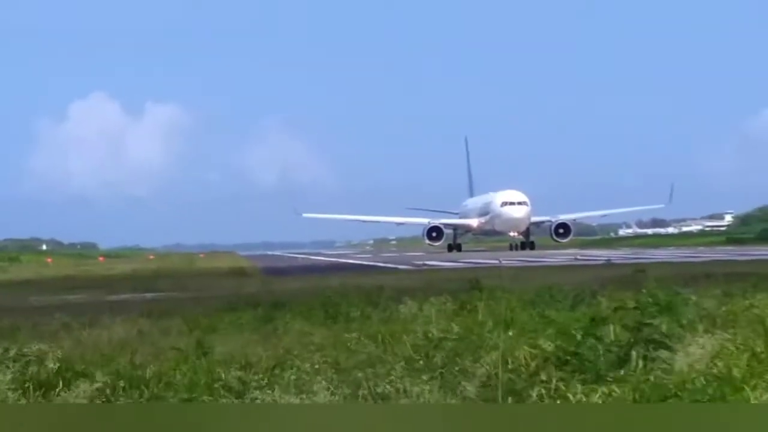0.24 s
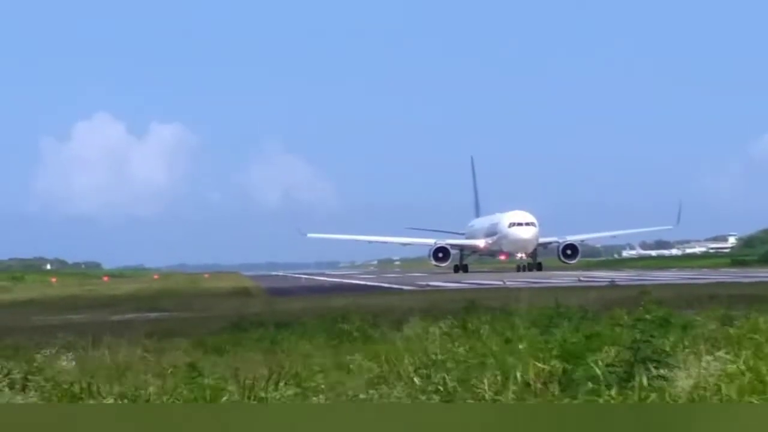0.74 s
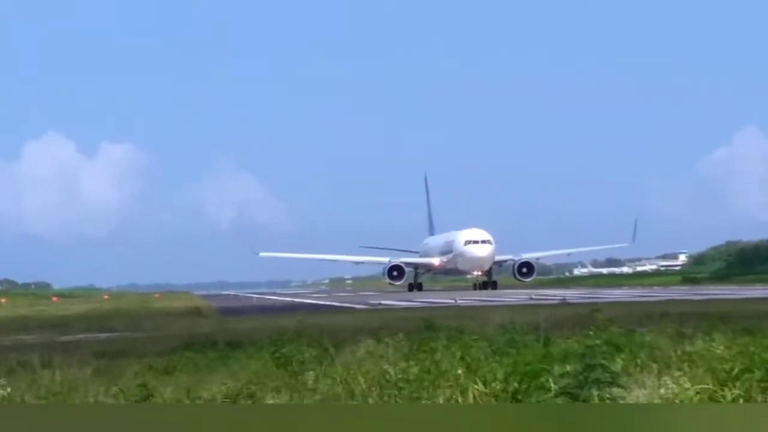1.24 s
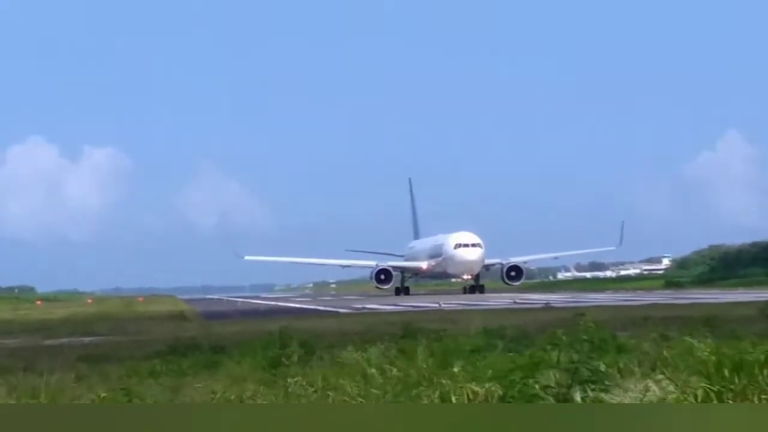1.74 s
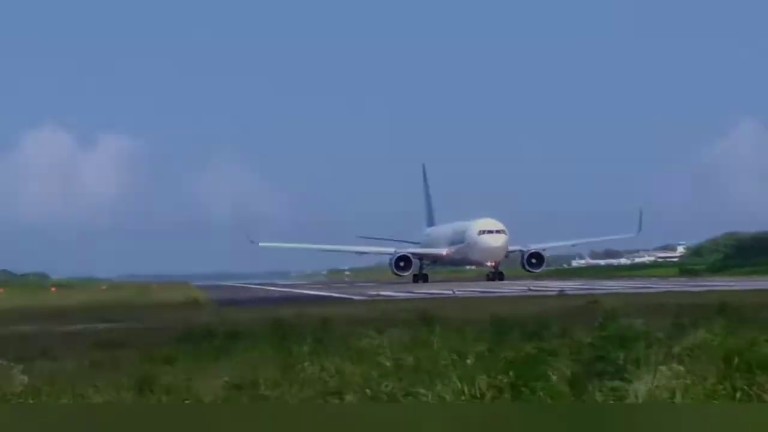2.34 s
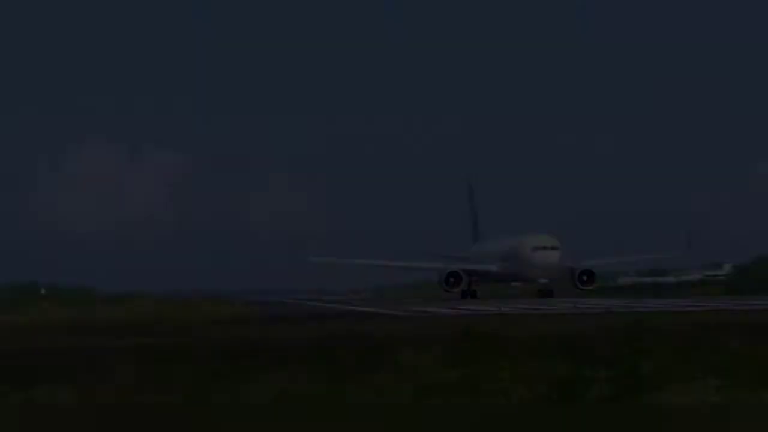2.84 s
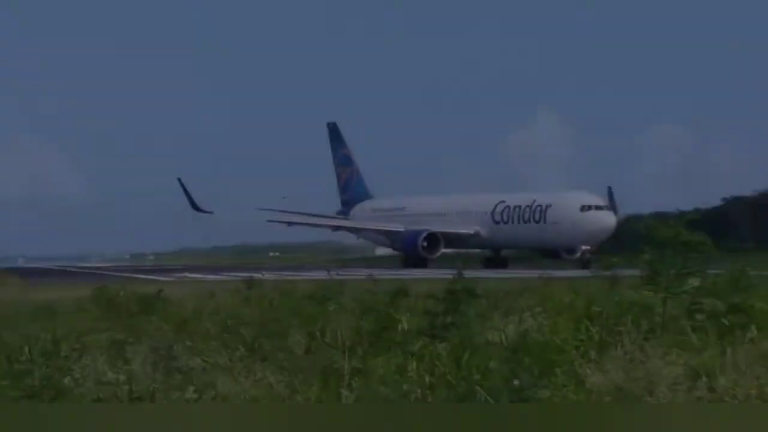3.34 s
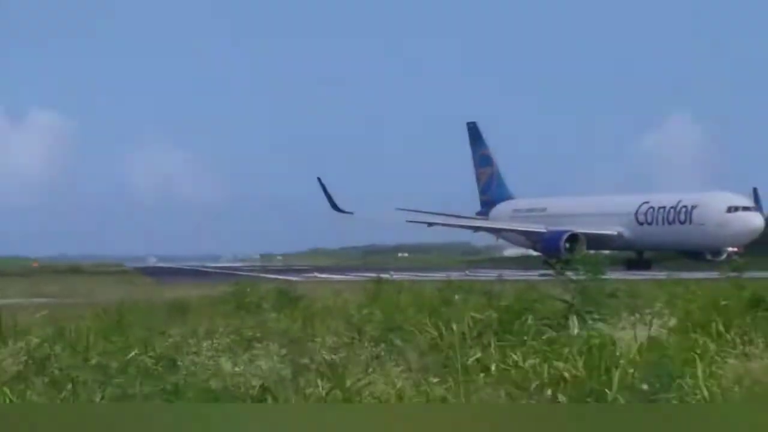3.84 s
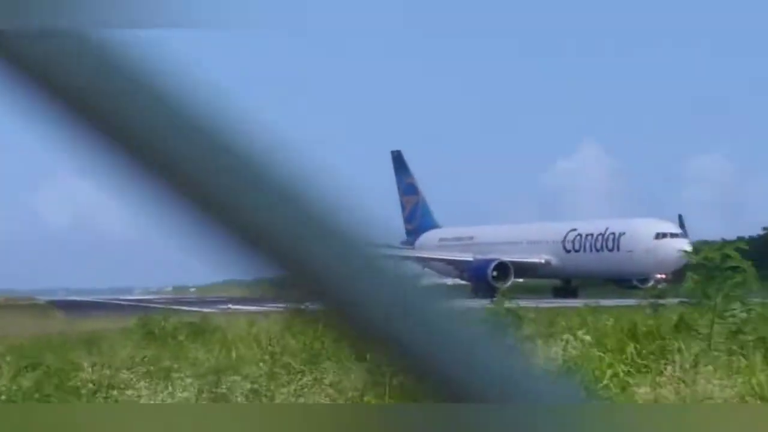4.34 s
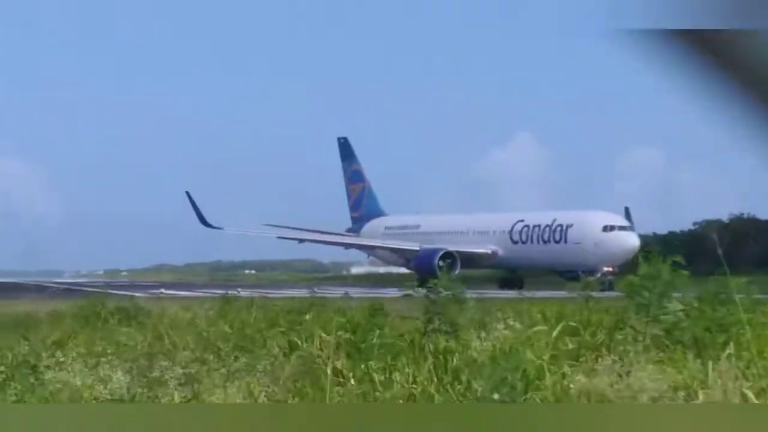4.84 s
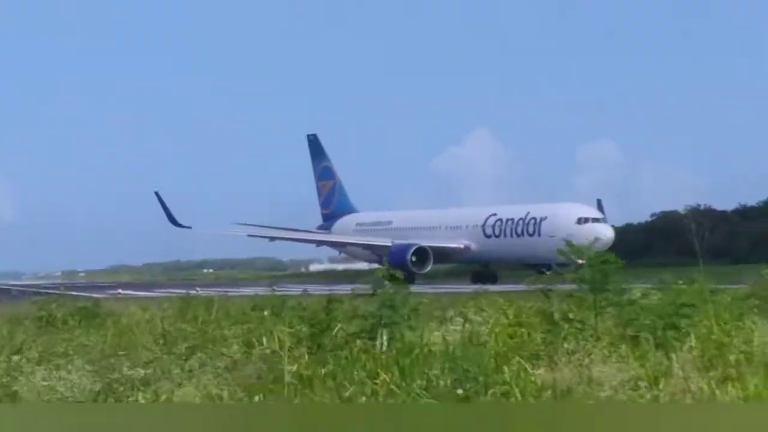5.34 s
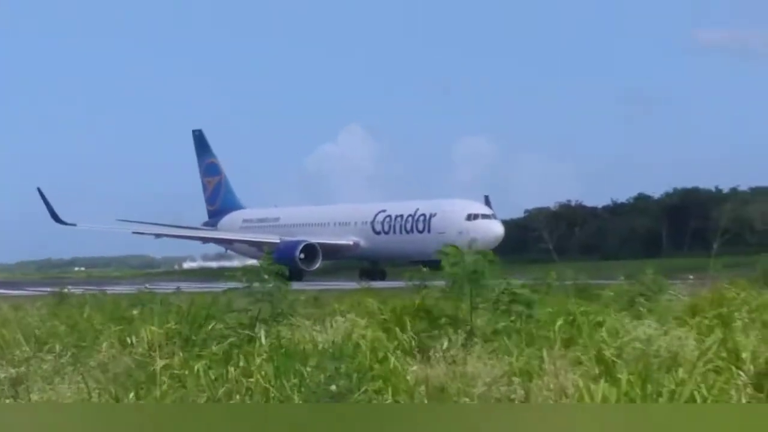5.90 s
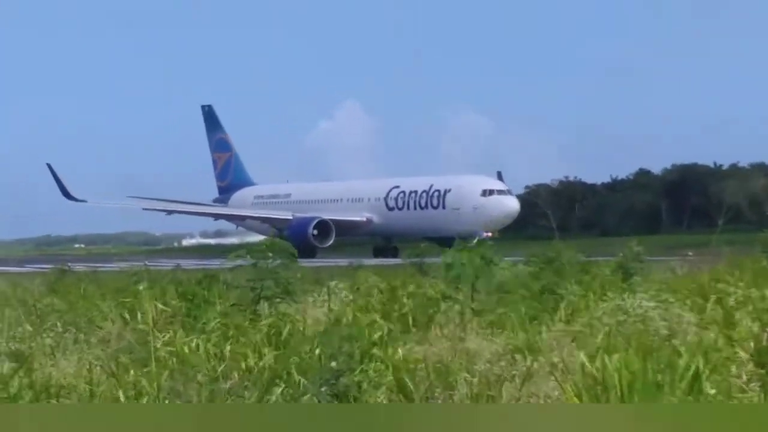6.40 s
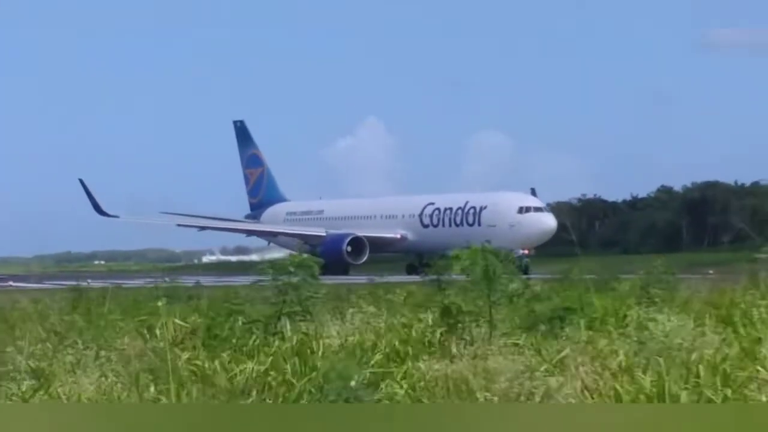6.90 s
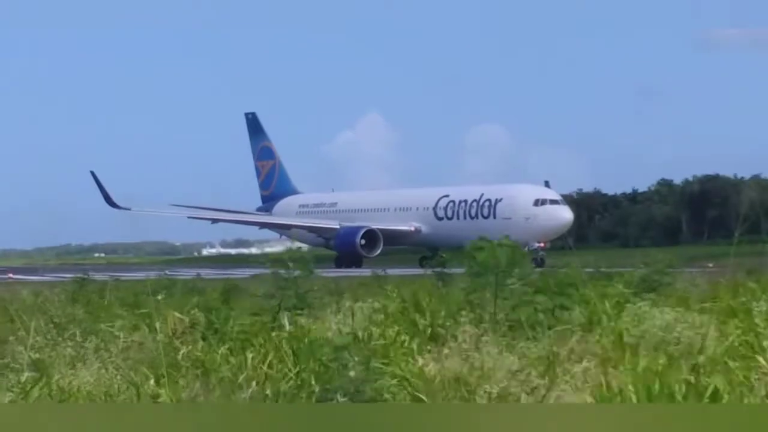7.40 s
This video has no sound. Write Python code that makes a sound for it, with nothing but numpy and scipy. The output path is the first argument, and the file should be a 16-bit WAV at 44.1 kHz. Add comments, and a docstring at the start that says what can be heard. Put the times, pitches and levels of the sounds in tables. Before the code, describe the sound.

Shrill, wavering jet engine whine over a steady roar, wind buffeting the microphone, fading to silence midway and returning with a second whine and swelling roar.

```python
"""An airliner rolls along a runway, seen head-on: one strong blade whine and weak blade tones over the jets' roar.
Gusts buffet the microphone from the start and the camera body ticks; the sound fades to silence near 3 s.
It fades up side-on with a second whine, the first a step lower, and another roar; a hand rustles on the body near 4 s.
Whines are sines over scattered paths, the weak tones wandering sines, roar and wind shaped noise in wavering bands;
hard slaps of wind are short rings, the ticks and the rustle bursts and grains of bright noise."""
import sys
import numpy as np
from scipy import signal
from scipy.fft import rfft, irfft, next_fast_len
from scipy.io import wavfile
from scipy.ndimage import uniform_filter1d

SR = 44100
rng = np.random.default_rng(int(sys.argv[2]) if len(sys.argv) > 2 else 0)


def master(y):
    """Save y as 16-bit WAV."""
    cut = np.clip(np.atleast_2d(y).T, -1, 1)
    pcm = np.round(cut * 32767)  # scale
    wavfile.write(sys.argv[1], SR, pcm.astype(np.int16))


def gain_from_db(level_db):
    """Turn a decibel level (scalar or array-like) into a linear amplitude factor."""
    decades = np.asarray(level_db, float) / 20
    return 10 ** decades


N = 337806
T = np.arange(N) / SR
SLOW = T[::32]  # moments at which slow curves and slow chance are drawn
CUT_S = 2.9755  # head-on before, side-on after

# hardest slaps of wind on the microphone: start_s, peak_db
SLAPS = [(2.103, -12), (4.5, -12), (4.53, -3), (4.852, -11), (5.954, -4), (6.13, -11)]


def curves(table):
    """Reads the columns of a time table at the slow moments."""
    time_s, *columns = np.transpose(table)
    return [np.interp(SLOW, time_s, column) for column in columns]


def gain(slow_db):
    """Turns a slow dB curve into one gain a sample."""
    return np.interp(T, SLOW, gain_from_db(slow_db))


def unit(x):
    """Scales a signal to rms 1."""
    return x / np.sqrt(np.mean(x ** 2))


def walk(rate):
    """Slow chance of spread 1: random levels held for 1 / rate seconds, then smoothed twice."""
    hold = max(int(1 / (rate * SLOW[1])), 2)
    held = np.repeat(rng.standard_normal(len(SLOW) // 2 + 1), hold)[:len(SLOW)]
    return unit(uniform_filter1d(uniform_filter1d(held, hold), hold))


def patchy(shape, own_db, own_rate, shared_db, count):
    """Shaped noise of rms 1 in count bands an octave; each band wavers alone and with a shared curve."""
    size = next_fast_len(N, True)
    octave = np.log2(np.maximum(np.arange(size // 2 + 1) * SR / size, 1))
    pitch_hz, density_db = np.transpose(shape)
    knots = np.log2(pitch_hz)
    inside = (octave >= knots[0]) & (octave <= knots[-1])
    spectrum = rfft(rng.standard_normal(size)) * inside
    spectrum = spectrum * gain_from_db(np.interp(octave, knots, density_db))
    out = 0
    for centre in np.arange(knots[0], knots[-1] + 1 / count, 1 / count):
        # overlapping raised-cosine bands add up to the whole shape
        band = np.cos(np.pi / 2 * np.clip((octave - centre) * count, -1, 1)) ** 2
        noise = irfft(spectrum * band, size)[:N]
        out = out + noise * gain(own_db * walk(own_rate) + shared_db)
    return unit(out)


def handling():
    """Short bright ticks of the camera body and one grainy rustle: two envelopes on the same bright noise."""
    # ticks of the camera body: start_s, level_db
    ticks = [(1.0037, -54), (1.14, -50), (1.2926, -56), (1.8553, -46.5), (1.9816, -51.5), (2.1023, -51),
             (2.4145, -53), (2.4968, -50), (3.3927, -43), (3.5959, -45), (4.0742, -43), (4.0941, -45)]
    # a hand slides on the body: time_s, level_db
    rustle = [(3.91, -70), (3.935, -51), (4.07, -51), (4.10, -48), (4.12, -70)]
    bright = [(5000, -6), (7500, -1), (9000, -7), (12000, 0), (15700, -2)]  # pitch_hz, relative density_db
    burst, after = np.zeros(N), np.arange(int(0.012 * SR)) / SR
    for start_s, level_db in ticks:
        start = int(start_s * SR)
        burst[start:start + len(after)] += gain_from_db(level_db) * np.exp(-after / 0.002)
    grain = gain(curves(rustle)[0] + 1.2 * walk(90))
    return (burst + grain) * patchy(bright, own_db=1, own_rate=30, shared_db=0, count=1)


def thumps():
    """Single large swirls slap the microphone port: a ring that drops from 340 Hz, settles at 170 Hz and dies."""
    out, after = np.zeros(N), np.arange(int(0.05 * SR)) / SR
    bend = 1 + np.exp(-after / 0.0045)
    ring = np.sin(2 * np.pi * 170 * after * bend) * np.exp(-after / 0.0099)
    for start_s, peak_db in SLAPS:
        start = int(start_s * SR)
        out[start:start + len(after)] -= gain_from_db(peak_db) * ring / ring.max()
    return out


def wind():
    """Pressure swirls on the microphone port: bursts that hit deep rumble and rough flutter together."""
    # gusts: time_s, rumble_db, flutter_db
    gusts = [(0.0, -13.5, -21.5), (0.33, -16, -23.5), (0.42, -23, -34), (0.47, -17, -25.5),
             (0.56, -27.5, -31.5), (0.71, -13.5, -22.5), (0.83, -25.5, -32), (0.96, -24.5, -34.5),
             (1.22, -34.5, -52), (1.5, -28.5, -46), (1.86, -33, -47), (2.0, -22, -26), (2.12, -23.5, -28),
             (2.4, -17.5, -23.5), (3.23, -31, -36), (3.47, -22.5, -31.5), (3.6, -30.5, -35.5),
             (3.8, -11, -21.5), (4.06, -19.5, -28), (4.28, -20.5, -22.5), (4.45, -24, -34),
             (4.53, -20, -26), (4.65, -22.5, -28), (4.96, -26, -37), (5.15, -21.5, -26.5),
             (5.73, -20, -22.5), (5.92, -18.5, -26), (6.015, -14, -23), (6.04, -28, -40), (6.25, -30, -42),
             (6.44, -23.5, -26.5), (6.77, -30, -54), (7.05, -34, -59), (7.34, -28, -37), (7.66, -36, -60)]
    # noise shapes: pitch_hz, relative density_db
    rumble_shape, flutter_shape = [(20, -62), (33, -41), (56, -5.5), (97, 1), (180, -1.5), (280, -12),
                                   (400, -33.5)], [(180, -2), (270, 1.5), (400, -2), (700, -11.5),
                                                   (1200, -21.5), (2000, -31)]
    rumble_db, flutter_db = curves(gusts)
    buffet = 2.13 * walk(50) + 0.76 * walk(20)
    rumble = gain(rumble_db) * patchy(rumble_shape, own_db=0.77, own_rate=25, shared_db=buffet, count=1)
    # a rough burst around each slap: level under its peak, half length
    burst_db, burst_s = -16.5, 0.019
    bursts = sum(gain_from_db(peak_db + burst_db) * np.exp(-((T - start_s) / burst_s) ** 2) for start_s, peak_db in SLAPS)
    flutter = patchy(flutter_shape, own_db=1.0, own_rate=20, shared_db=1.53 * buffet, count=1)
    return rumble + (gain(flutter_db) + bursts) * flutter


def tone(hz, wander, fade_db, fade_rate):
    """A sine of rms 1 whose path length (wander, in radians) and strength drift in the turbulent air."""
    phase = 2 * np.pi * (np.cumsum(hz) / SR + rng.random())
    phase = phase + np.interp(T, SLOW, wander * walk(fade_rate))
    return unit(np.sin(phase) * gain(fade_db * walk(fade_rate)))


def jets(hz):
    """Jet roar and weak blade tones; eddies make the roar come in drifting patches."""
    # roar swells: time_s, low_roar_db, high_roar_db
    swells = [(0.0, -30.5, -32.5), (0.28, -31, -32), (0.74, -34, -32.5), (0.88, -34, -34.5),
              (1.03, -35, -33.5), (1.49, -32, -33), (1.8, -35, -37.5), (2.11, -31, -33.5),
              (2.54, -29, -29.5), (3.21, -36.5, -37), (3.61, -32, -32), (4.15, -30.5, -34),
              (4.6, -29, -27.5), (5.22, -27.5, -29.5), (5.63, -29, -30.5), (5.85, -25, -25),
              (6.3, -24, -21.5), (6.55, -27, -27), (6.87, -26, -29.5), (7.66, -28.5, -24.5)]
    # swells of the thin top of the jet noise: time_s, level_db
    top_swells = [(0.0, -58), (2.48, -53.5), (3.29, -55.5), (3.8, -51), (4.25, -52.5), (4.54, -51),
                  (5.57, -52.5), (6.27, -49), (6.92, -52), (7.66, -46.5)]
    # weak blade tones: pitch over the first whine [ratio], head_on_db and side_on_db over the low roar
    blade_tones = [(.083, -12, -17.5), (0.1406, -22, -14.5), (0.427, -24.5, -22), (0.5293, -14, -13),
                   (0.694, -18.5, -19.5), (0.7218, -16.5, -16), (0.8364, -33, -16.5), (.859, -22, -24),
                   (1.0533, -28, -20.5), (1.1683, -21.5, -29), (2.575, -58, -48.5)]
    # noise shapes, low roar to thin top: pitch_hz, relative density_db
    head_shape, side_shape = [(250, -4.5), (500, -8), (790, 1.5), (1100, -8), (1500, -10), (1950, -8.5),
                              (2120, -2.5), (2300, -10), (2550, -7), (2900, -14)], [(250, -33), (500, -8.5), (820, -1.5), (1050, -10.5),
                                                (1700, -3), (1900, -5.5), (2150, -0.5), (2500, -9.5),
                                                (2900, -37)]
    high_shape, edge_shape, top_shape = [(2300, -19), (2650, -6), (3500, 0.5), (4500, -1.5), (5000, -53)], [(4300, -10), (4700, 0.5), (5600, -5.5), (6700, -20),
                                                       (8000, -32), (9500, -55)], [(6000, 6), (7800, -0.5), (9000, -9.5),
                                                                     (10000, -4), (11700, -0.5),
                                                                     (13300, -5.5), (15700, -12)]
    low_db, high_db = curves(swells)
    edge_db = high_db + np.where(SLOW > CUT_S, -6, -7.5)  # bright edge under the high roar
    side_on = T > CUT_S
    eddies = 0.94 * walk(7.4)
    head = patchy(head_shape, own_db=4.0, own_rate=2.07, shared_db=eddies, count=5)
    side = patchy(side_shape, own_db=2.5, own_rate=2.314, shared_db=eddies, count=5)
    blades = 0
    for ratio, head_db, side_db in blade_tones:
        strength = np.where(side_on, gain_from_db(side_db), gain_from_db(head_db))
        blades = blades + strength * tone(hz * ratio, wander=2.07, fade_db=2.5, fade_rate=24)
    low = gain(low_db) * (np.where(side_on, side, head) + blades)
    high = gain(high_db) * patchy(high_shape, own_db=1.15, own_rate=4.6, shared_db=eddies, count=5)
    edge = gain(edge_db) * patchy(edge_shape, own_db=0.57, own_rate=7, shared_db=eddies, count=4)
    # the thin top hardly wavers
    thin = patchy(top_shape, own_db=0.4, own_rate=8.3, shared_db=0.6 * walk(9), count=3)
    return low + high + edge + gain(curves(top_swells)[0]) * thin


def scattered(hz, share, slow_rate, quick, quick_rate):
    """A sine of rms 1: straight and scattered paths add as pressures, so swells are round and gaps sharp."""
    def drift(rate):
        """A scattered path: a complex pressure that wanders around zero."""
        return np.interp(T, SLOW, walk(rate)) + 1j * np.interp(T, SLOW, walk(rate))

    paths = 1 + share * drift(slow_rate) + quick * drift(quick_rate)
    return unit(np.imag(paths * np.exp(2j * np.pi * np.cumsum(hz) / SR)))


def gaps(rows):
    """Where the paths of a whine cancel, the summed pressure sinks almost to nothing."""
    left = gain_from_db(-21)  # what remains at the bottom of a gap
    dips = 1
    for centre_s, half_s in rows:
        away = np.tanh((SLOW - centre_s) / max(half_s, 0.005))
        dips = dips * np.hypot(away, left) / np.hypot(1, left)
    return np.interp(T, SLOW, dips)


def whine(hz):
    """The two strong blade whines: scattered sines that swell slowly and drop out; the second only side-on."""
    # slow swells of each whine: time_s, level_db
    first_swells, second_swells = [(0.0, -18), (0.3, -28.5), (0.8, -22), (0.97, -26), (1.12, -21),
                                   (1.36, -22.5), (1.6, -31), (2.0, -28.5), (2.58, -18), (2.75, -27),
                                   (3.2, -37.5), (3.35, -32.5), (3.61, -31), (4.05, -35.5), (4.3, -34.5),
                                   (4.59, -21.5), (4.9, -29.5), (5.15, -25), (5.6, -29), (6.04, -19.5),
                                   (6.2, -26), (6.6, -29), (6.84, -23), (7.3, -26), (7.66, -24)], [(3.05, -44), (3.4, -38), (3.7, -37.5), (3.97, -31),
                                                  (4.2, -41.5), (4.73, -29.5), (5.0, -37), (5.3, -35),
                                                  (5.6, -38), (6.2, -29.5), (6.7, -37), (6.91, -33.5),
                                                  (7.2, -36.5), (7.45, -25.5), (7.66, -30)]
    # drop-outs of each whine: centre_s, half_length_s
    first_gaps, second_gaps = [(.1, 0.0072), (.28, 0.024), (.36, 0.013), (.51, 0.024), (.69, 0.01),
                               (.91, 0.026), (1.01, 0.012), (1.21, 0.027), (1.29, 0.036), (1.78, 0.032),
                               (1.9, 0.02), (2.17, 0.022), (2.33, 0.065), (2.49, 0.042), (3.29, .02),
                               (3.79, 0.014), (3.96, .05), (4.15, .03), (4.53, 0.027), (4.72, 0.024),
                               (4.83, .015), (5.02, 0.067), (5.69, 0.032), (5.84, 0.017), (6.12, 0.057),
                               (6.35, 0.021), (6.62, 0.036), (7.14, .03), (7.3, 0.01), (7.37, 0.057),
                               (7.45, 0.019)], [(3.83, 0.059), (4.08, 0.027), (4.55, 0.023),
                                                   (4.81, 0.016), (4.92, 0.025), (5.15, .05), (5.33, 0.013),
                                                   (5.63, 0.042), (6.13, 0.024), (6.37, 0.018), (6.69, .04),
                                                   (6.84, 0.022), (7.13, .03), (7.36, 0.025)]
    second_ratio = 1.1416  # pitch of the second whine over the first
    first = scattered(hz, share=0.13, slow_rate=19, quick=0.24, quick_rate=50)
    first = first * gain(curves(first_swells)[0]) * gaps(first_gaps)
    second = scattered(hz * second_ratio, share=0.26, slow_rate=16, quick=0.75, quick_rate=54)
    second = second * gain(curves(second_swells)[0]) * gaps(second_gaps)
    # head-on, a loud whine gains a faint octave: its square, less a 1 ms mean that holds the offset
    square = gain_from_db(-52) * (T < CUT_S) * first ** 2 / np.std(first)
    octave = square - uniform_filter1d(square, 44)
    return first + (T > CUT_S) * second + octave


def scene():
    """Adds wind, handling, jets and whines at one microphone that feeds both channels."""
    # first whine, sinks slightly head-on, steps lower at the cut, nearly steady side-on: time_s, pitch_hz
    whine_pitch = [(0, 4018), (2.97, 4001), (2.98, 3988), (7.66, 3984)]
    hz = np.interp(T, *np.transpose(whine_pitch))
    return np.tile(handling() + thumps() + wind() + jets(hz) + whine(hz), (2, 1))


def roll_off(x):
    """The treble ends steeply here."""
    return signal.sosfilt(signal.butter(12, 15670, fs=SR, output="sos"), x)


def record(dry):
    """The microphone loses the deepest bass and rounds the loudest buffets; an edit fades out and in at the cut."""
    bass_cut = signal.butter(2, 38, "highpass", fs=SR, output="sos")  # Hz
    heard = signal.sosfilt(bass_cut, dry)
    rounded = heard / (1 + np.abs(heard / 1.1) ** 4) ** (1 / 4)
    fade_s = 1.0  # each side of the cut
    fade = np.clip(np.abs(T - CUT_S) / fade_s, 0, 1)
    return roll_off(fade * rounded)


dry = scene()
out = record(dry)
master(out)
```